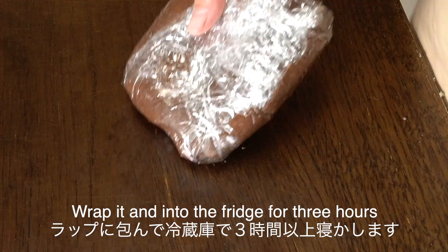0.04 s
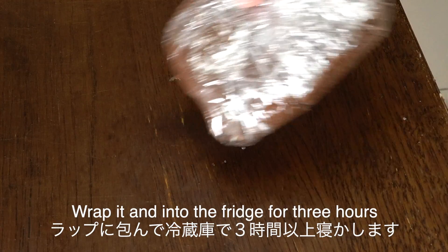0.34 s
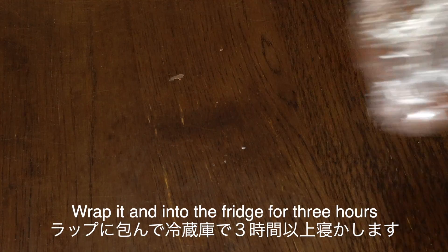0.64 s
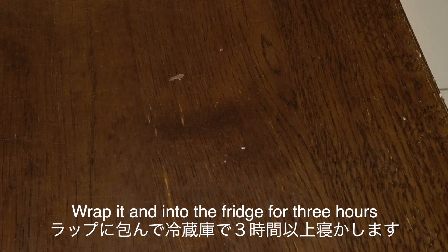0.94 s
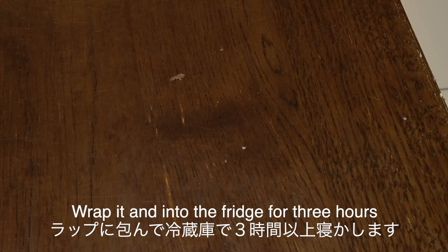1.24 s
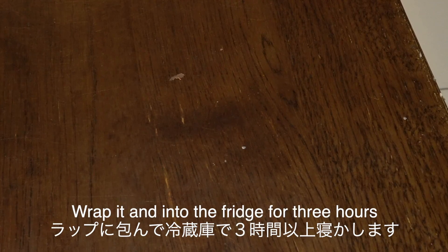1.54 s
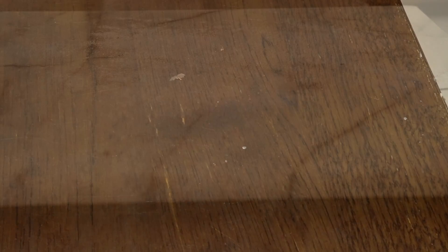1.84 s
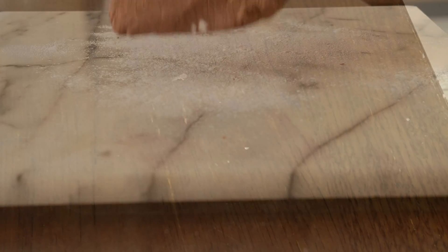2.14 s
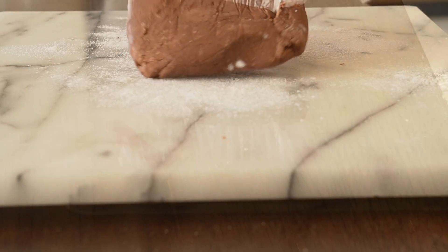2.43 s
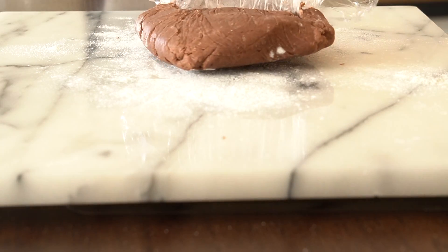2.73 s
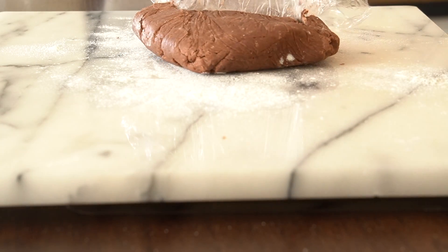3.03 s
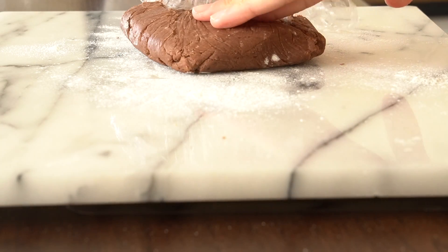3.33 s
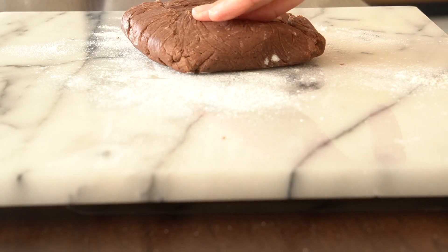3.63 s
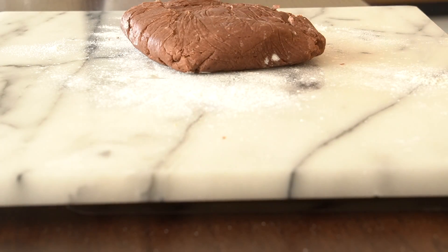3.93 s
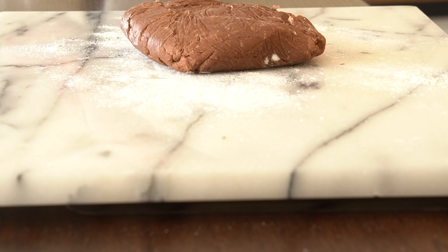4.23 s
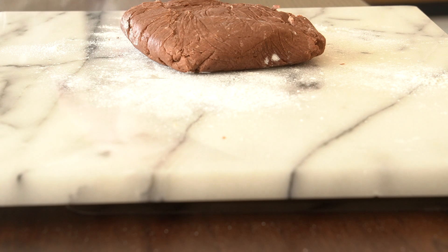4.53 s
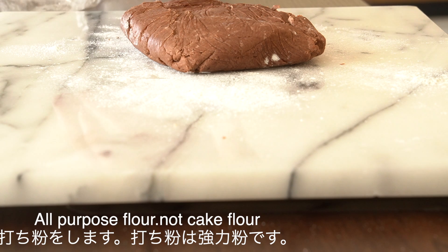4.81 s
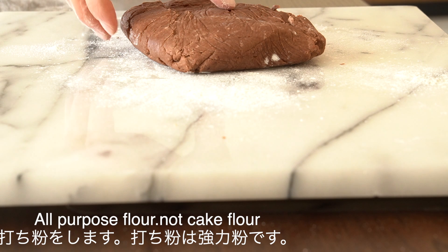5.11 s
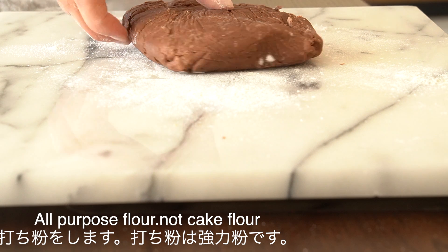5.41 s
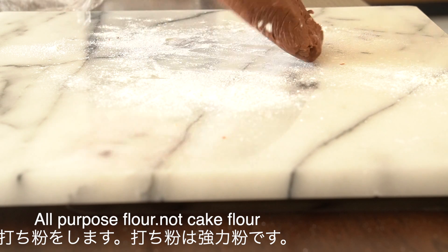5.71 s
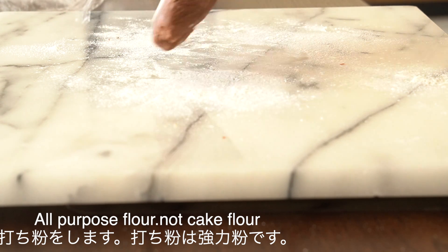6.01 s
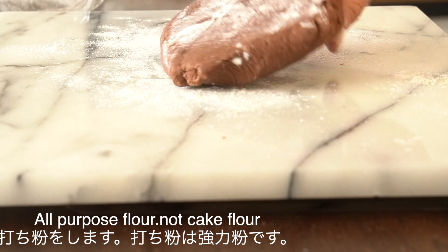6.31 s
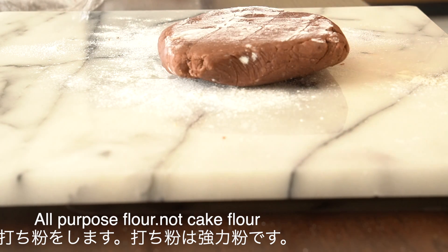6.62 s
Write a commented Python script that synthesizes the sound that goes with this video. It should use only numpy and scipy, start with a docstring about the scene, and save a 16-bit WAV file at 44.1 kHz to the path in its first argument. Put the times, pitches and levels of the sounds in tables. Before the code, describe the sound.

Close up, plastic-wrapped dough is handled in a slightly echoing kitchen. Cloth rustles against a fan hum, followed by a distant knock and a brief, very deep wobble. The hum gives way to quiet room tone while the dough lands in a run of soft thuds on stone. The wrap crackles and unsticks with a short rasp. Hands rustle lightly, and two more dull landings come near the end.

```python
"""A lump of dough in cling film thumps and slaps down in a small kitchen, setting slab and table ringing.
Sleeves swish over an appliance hum; a distant knock and a deep wobble come as the dough is picked up.
The hum fades under a run of soft landings. The film crinkles as its creases buckle, then peels off
in one sticky pull. Hands rustle, and the dough is turned over and lands twice on the stone slab.
The room rings on after each contact."""
import sys
import numpy as np
from scipy import signal
from scipy.fft import rfft, irfft, next_fast_len
from scipy.io import wavfile
from scipy.ndimage import uniform_filter1d

SR = 44100
rng = np.random.default_rng(int(sys.argv[2]) if len(sys.argv) > 2 else 0)


def transcribe(u):
    """Save the signal u as a 16-bit wav file named by the first command-line argument.

    u: samples, shape (n,) or (channels, n), limited to [-1, 1]; the rate is SR.
    q: integer samples, one column per channel.
    """
    v = np.clip(np.atleast_2d(u).T, -1, 1)
    q = np.round(v * 32767).astype(np.int16)
    wavfile.write(sys.argv[1], SR, q)


N = 298116
TIME = np.arange(N) / SR

# Event levels are relative within a layer; the layer's trim and the room come on top.
# fan noise of the running appliance: f/Hz, level/dB
FAN_EQ = [(12, -41), (20, -5), (65, -3), (123, -10.5), (301, -16.5), (446, -16), (678, -15.5), (759, -21.5),
          (825, -16), (1290, -18), (1570, -21.5), (2530, -20), (3340, -29), (11100, -39.5), (16000, -43)]
# appliance hum: f/Hz, level/dB
APPLIANCE_HUM = [(59.2, -80), (118.4, -71.5), (759, -71.5)]
# quieter room tone that takes over: f/Hz, level/dB
ROOM_TONE_EQ = [(12, -28), (20, -1), (127, -6), (163, -9.5), (285, -12), (388, -14.5), (434, -15),
                (825, -18.5), (1000, -18), (1190, -20.5), (1910, -23.5), (2990, -22.5), (3440, -29.5),
                (14700, -37.5), (16000, -38)]
# faint whines in the quiet room: f/Hz, level/dB
ROOM_WHINES = [(1174, -88.5), (1507, -88), (1615, -90)]
# stereo width of the noise beds: f/Hz, side over mid/dB
BED_WIDTH = [(30, 7.5), (70, -0.5), (150, 1), (600, 0.5), (1400, -2), (2700, -5), (4000, -2), (8000, -1),
             (16000, -2)]
# kitchen reverb time: f/Hz, t60/s
KITCHEN_DECAY = [(100, 0.89), (300, 0.43), (1000, 0.56), (3000, 0.7), (7000, 0.57), (15000, 0.33)]
# stereo width of the reflections: f/Hz, side over mid/dB
KITCHEN_WIDTH = [(60, 7), (200, -2.5), (700, -3.5), (1500, -5), (2700, -13), (4200, -4), (8000, 0.5),
                 (16000, 3)]
# sleeves and hands sliding: t/s, rise/s, length/s, level/dB
SLEEVE_MOVES = [(.07, 0.11, 0.28, -61.5), (.655, 0.005, 0.02, -57.5), (.68, 0.45, 0.44, -56.5),
                (4.6, 0.012, .025, -65.5), (4.718, 0.0074, 0.16, -67.5), (5.655, 0.019, .05, -76),
                (6.39, .05, .06, -74)]
# friction of cloth and skin: f/Hz, level/dB
SLEEVE_EQ = [(300, -8), (900, -11), (1800, -2), (2800, 2), (3600, -2.5), (6000, -6.5), (10000, -15),
             (13000, -19.5), (16000, -23)]
# short scuffs of hands, film and landing dough: t/s, level/dB, f/Hz, width/Hz, t60/s
SCUFFS = [(.156, -45, 2280, 895, 0.024), (1.518, -43.5, 3630, 2920, 0.059),
          (1.519, -47.5, 9050, 2500, 0.048), (2.52, -50, 2200, 2000, .15), (2.776, -52.5, 2300, 1460, .42),
          (3.25, -50, 2370, 1450, 0.04), (4.355, -61, 2520, 700, 0.12), (4.422, -58, 2380, 1200, 0.17),
          (4.722, -61.5, 3330, 1800, 0.15), (5.663, -75.5, 11000, 6000, 0.44),
          (6.144, -61, 2490, 1600, .069), (6.446, -60, 2600, 2000, 0.039)]
# sub-bass swells: t/s, rise/s, length/s, level/dB
SUB_SWELLS = [(1.3, 0.68, 1.1, -54), (2.03, 0.057, 0.21, -41.5)]
# fingers gripping and shifting the film: t/s, length/s, level/dB
FILM_GRIPS = [(1.45, 0.61, -70), (1.999, .04, -60), (2.116, 0.11, -64), (2.284, 0.073, -61),
              (2.37, 0.044, -56), (2.45, 0.079, -50.5), (2.576, 0.026, -51.5), (2.667, 0.027, -52.5),
              (2.754, 0.1, -50.5), (2.867, .08, -57), (3.024, 0.11, -59), (3.199, 0.057, -58.5),
              (3.873, 0.24, -66), (4.18, .18, -72), (4.342, 0.28, -65.5)]
# crinkling film: f/Hz, level/dB
FILM_EQ = [(300, 2), (1000, -1.5), (2000, 2), (2900, 1), (4800, -5.5), (6500, -2), (9000, -6.5),
           (13000, -8), (16000, -16)]
# single creases snapping: t/s, level/dB, f/Hz
CREASE_SNAPS = [(1.7476, -47, 8550), (2.0917, -45.5, 8100), (2.128, -45, 6250), (2.2193, -46, 6950),
                (2.304, -41, 5940), (2.3225, -40.5, 5940), (2.376, -35.5, 11400), (2.3908, -37.5, 4540),
                (2.4675, -38, 6220), (2.543, -38, 7780), (2.59, -42, 6470), (3.043, -42, 6600),
                (3.082, -37, 6800), (3.1344, -45, 7660), (3.3498, -30, 7500), (4.531, -42.5, 6350),
                (4.609, -50, 6710), (4.777, -50.5, 5770)]
# blows of a knock across the kitchen: t/s, level/dB
KNOCK_HITS = [(1.6107, -44), (1.615, -42), (1.688, -56)]
# dull body of the knock: f/Hz, level/dB
KNOCK_EQ = [(60, -9), (115, 6.5), (290, -11), (460, 5.5), (700, -9), (1100, -6.5), (1800, -13.5),
            (3000, -20), (4500, -36), (10000, -47)]
# dough landings: t/s, level/dB, f/Hz, swell/cycles, slap over thump/dB, slab jolt over slap/dB
LANDINGS = [(2.014, -48.5, 150, 0.44, -33, 0), (2.301, -37, 218, 0.68, -41, 0),
            (2.507, -31.5, 238, 0.86, -22, 0), (2.520, -27.5, 250, 0.79, -4, -9),
            (2.583, -30, 243, .59, -7.5, -6), (2.634, -35, 265, 0.92, -12, -6),
            (2.834, -33, 201, 0.64, -6.5, -8), (6.1415, -26, 195.5, 0.47, -12.5, -5),
            (6.433, -39.5, 154, 0.42, -16, -3), (6.448, -35.5, 196, 0.37, -18, 11),
            (6.468, -36, 226, .45, -17, 0)]
# air slapping out from under the dough: f/Hz, level/dB
SLAP_EQ = [(150, 1), (300, -1.5), (500, 0.5), (740, -7), (1080, -7.5), (1400, -23), (2800, -20),
           (3800, -44), (8000, -45), (16000, -56)]
# modes of slab, table and room: f/Hz, level/dB, t60/s, left phase lead/rad
SLAB_AND_ROOM_MODES = [(62.7, -7, 1, -2.5), (126, -11, 0.31, -0.5), (135, -15.5, 0.47, -1.4),
                       (159.5, -21.5, 0.49, -5.5), (200.2, -28.5, 0.5, -1.5), (238, -18.5, 0.12, -1.5),
                       (302.6, -15, 0.26, -3), (393, -23, 0.24, 3.5), (502, -8, 0.23, -1.5),
                       (676, -35, 0.18, -1), (912, -1, 0.33, -1.6), (1065, -6, 0.15, -2),
                       (2690, -1, 0.19, -.5)]
# the peeling pull, hardest just before it ends: t/s, level/dB
PEEL_PULL = [(3.358, -45.5), (3.368, -54.5), (3.39, -37), (3.528, -42), (3.542, -34), (3.622, -36.5),
             (3.664, -28.5), (3.668, -31)]
# film unsticking from dough: f/Hz, level/dB
PEEL_EQ = [(47, -46), (80, -16), (125, -8), (199, -14), (303, -8), (353, -12), (917, -8.5), (1340, -7.5),
           (1490, -6.5), (2840, -3), (4830, -11.5), (5520, -7.5), (12500, -13.5), (16000, -17.5)]
# taut film twanging during the pull: t/s, level/dB, f/Hz, width/Hz, t60/s
FILM_TWANG = (3.5, -27, 2800, 900, 0.0035)


def undb(db):
    """Decibels to gain."""
    return 10 ** (np.asarray(db) / 20)


def fade(t, t60):
    """Exponential decay of 60 dB in t60."""
    return np.exp(-np.log(1000) * t / t60)


def add(track, s, sound):
    """Mix a sound in at s seconds."""
    i = int(s * SR)
    track[i:i + len(sound)] += sound[:N - i]


def lookup(hz, points):
    """Read (Hz, value) points on a log-frequency axis."""
    f, value = np.transpose(points)
    return np.interp(np.log(hz + 1), np.log(f), value)


def eq(x, points, keep_power=True):
    """Filter by (Hz, dB) points; keep_power holds white noise at the same power."""
    size = next_fast_len(len(x) + 2048)
    gain = undb(lookup(np.arange(size // 2 + 1) * SR / size, points))
    if keep_power:
        gain = gain / np.sqrt(np.mean(gain ** 2))
    return irfft(rfft(x, size) * gain, size)[:len(x)]


def resonate(x, hz, width_hz):
    """One resonance, gain 1 at its centre."""
    return signal.lfilter(*signal.iirpeak(min(hz, SR * .45), hz / width_hz, fs=SR), x)


def drift(rate):
    """Smooth random modulation, rate turns a second, with a spread near 1."""
    hold = int(SR / rate)
    steps = np.repeat(rng.standard_normal(N // hold + 1), hold)
    return 1.2 * uniform_filter1d(steps, hold)[:N]


def stereo(mid, side):
    """Left and right from mid and side."""
    return np.array([mid + side, mid - side])


def convolve(x, response):
    """Play a track through a stereo response."""
    return signal.fftconvolve(x[None], response, axes=1)[:, :N]


def strokes(rows, release_t60):
    """Envelope of gestures that rise, hold and die away; their powers add."""
    power = 0
    for s, rise, length, db in rows:
        attack = np.clip((TIME - s) / rise, 0, 1)
        release = fade(np.clip(TIME - s - length, 0, 2), release_t60)
        power += (undb(db) * attack * release) ** 2
    return np.sqrt(power)


def crackle(rate, spread_db):
    """Friction grain: rate random clicks a second, mostly weak, a few strong; rms 1."""
    size = undb(spread_db * np.minimum(rng.exponential(size=N), 3.5))
    clicks = (rng.random(N) < rate / SR) * size * np.sign(rng.standard_normal(N))
    return clicks / clicks.std()


def kitchen(x, early_db, late_db, early_t60=0.098):
    """Direct sound, quick reflections off the worktop, then the tail of the room."""
    t = np.arange(int(.8 * SR)) / SR
    hz = np.arange(len(t) // 2 + 1) * SR / len(t)

    def reflections():
        noise, tail = rfft(rng.standard_normal(len(t))), 0
        for centre, t60 in KITCHEN_DECAY:
            band = lookup(hz, [(f, f == centre) for f, _ in KITCHEN_DECAY])
            tail += irfft(noise * band, len(t)) * fade(t, t60) * (1 - np.exp(-t / 0.0019))
        early = rng.standard_normal(len(t)) * fade(t, early_t60) * (t > .001)
        return undb(late_db) * tail / np.linalg.norm(tail) + undb(early_db) * early / np.linalg.norm(early)

    mid = reflections()
    side = eq(reflections(), KITCHEN_WIDTH, keep_power=False)
    return x + convolve(x, stereo(mid, side))


def scatter(x, early_db, late_db, spots=3):
    """Each 64-sample grain comes from a random spot with its own reflections."""
    spot = np.repeat(rng.integers(0, spots, N // 64 + 1), 64)[:N]
    gates = (uniform_filter1d(1. * (spot == k), 32) for k in range(spots))
    return sum(kitchen(x * gate, early_db, late_db) for gate in gates)


def noise_bed(spectrum, db, flicker_db=0.9):
    """Diffuse room noise that wavers slightly."""
    mid, side = (eq(rng.standard_normal(N), spectrum) for _ in range(2))
    side = eq(side, BED_WIDTH, keep_power=False)
    return stereo(mid, side) * undb(db + flicker_db * drift(6))


def hum(partials, waver_db=1.3, waver_hz=1.05):
    """Held tones that waver a little in level and pitch."""
    track = np.zeros(N)
    for hz, db in partials:
        amplitude = np.sqrt(2) * undb(db + waver_db * drift(7))
        cycles = np.cumsum(hz + waver_hz * drift(11)) / SR
        track += amplitude * np.sin(2 * np.pi * cycles)
    return track


def ambience(fade_from_s=1.91, fade_to_s=2.31):
    """The hum and fan noise fade down while a quieter room tone fades up."""
    earlier = np.clip((fade_to_s - TIME) / (fade_to_s - fade_from_s), 0, 1)
    appliance = earlier * noise_bed(FAN_EQ, db=-61) + np.sqrt(earlier) * hum(APPLIANCE_HUM)
    room_tone = noise_bed(ROOM_TONE_EQ, db=-66) + hum(ROOM_WHINES)
    return appliance + np.sqrt(1 - earlier) * room_tone


def sleeves(trim_db=-4):
    """Cloth and skin slide in swishes of fine friction."""
    friction = eq(crackle(rate=9000, spread_db=2.5), SLEEVE_EQ)
    swishes = friction * strokes(SLEEVE_MOVES, release_t60=0.39)
    return scatter(undb(trim_db) * swishes, early_db=0.84, late_db=-1.3)


def scuffs(rows):
    """Short bursts of friction, each a band of noise with a fast attack."""
    t = np.arange(int(.4 * SR)) / SR
    attack = 1 - np.exp(-t / 0.0017)
    track = np.zeros(N)
    for s, db, hz, width_hz, t60 in rows:
        band = resonate(rng.standard_normal(len(t)), hz, width_hz)
        band = resonate(band, hz, width_hz)  # steeper skirts
        add(track, s, undb(db) * band / band.std() * attack * fade(t, t60))
    return kitchen(track, early_db=-5, late_db=-12)


def sub_wobble(hz=21, width_hz=7, side_db=9):
    """A wide, very deep wobble that swells as the dough first comes down."""
    phase = 2 * np.pi * np.cumsum(hz + width_hz / 2 * drift(20.87)) / SR
    return strokes(SUB_SWELLS, release_t60=.25) * stereo(np.sin(phase), undb(side_db) * np.cos(phase))


def creases(activity, ping_t60=0.0038, spread_db=4, candidates=30000):
    """Each buckling crease pings at its own pitch; more buckle as activity (0-1) rises."""
    t = np.arange(160) / SR
    when, chance, pitch, strength, phase = rng.random((candidates, 5)).T
    start = (when * (N - len(t))).astype(int)
    density = .2 + .8 * activity[start]
    buckles = chance < density
    # sparser pings are louder, so the power stays even
    gain = undb(spread_db * np.minimum(-np.log(strength), 3.5)) / np.sqrt(density)
    hz = 2000 + 14000 * pitch[buckles, None]
    pings = gain[buckles, None] * fade(t, ping_t60) * np.sin(2 * np.pi * (hz * t + phase[buckles, None]))
    positions = start[buckles, None] + np.arange(len(t))
    track = np.bincount(positions.ravel(), pings.ravel(), N)
    return track / track.std()


def film_crinkle(crinkle_db=-2, slide_db=-3, flurry_db=2, attack_s=0.016):
    """Creases buckle in flurries under the fingers and relax, over the friction of sliding film."""
    handling = strokes([(s, attack_s, length, db) for s, length, db in FILM_GRIPS], release_t60=0.36)
    flurries = creases(handling / handling.max()) * undb(crinkle_db + flurry_db * drift(70))
    sliding = undb(slide_db) * crackle(rate=4000, spread_db=4)
    return scatter(eq((flurries + sliding) * handling, FILM_EQ), early_db=-7.5, late_db=-6)


def distant_knock(trim_db=18, rattle_db=-20, rattle_t60=0.049):
    """A dull double knock with a short rattle, heard mostly through the room."""
    t = np.arange(int(.2 * SR)) / SR
    blows = np.zeros(N)
    for s, db in KNOCK_HITS:
        rattle = undb(rattle_db) * rng.standard_normal(len(t)) * fade(t, rattle_t60)
        add(blows, s, undb(db + trim_db) * ((t == 0) + rattle))
    return scatter(eq(blows, KNOCK_EQ), early_db=-0.83, late_db=3.1)


def film_snaps(trim_db=3, width_hz=8000, t60=0.0043):
    """Single creases give way with a bright, nearly dry tick."""
    t = np.arange(int(.02 * SR)) / SR
    snaps = np.zeros(N)
    for s, db, hz in CREASE_SNAPS:
        snap = resonate(rng.standard_normal(len(t)) * fade(t, t60), hz, width_hz)
        add(snaps, s, undb(db + trim_db) * snap / np.abs(snap).max())
    return kitchen(snaps, early_db=-9, late_db=-27)


def thump(t, hz, swell_cycles):
    """A soft contact that swells and dies in a few cycles."""
    squash = t * hz / (2 * swell_cycles)
    return squash ** 1.5 * np.exp(.75 * (1 - squash ** 2)) * np.sin(2 * np.pi * hz * t)


def slab_ring(force, trim_db=-38):
    """Slab, table and the room's standing waves ring on, out of phase between left and right."""
    t = np.arange(SR) / SR
    ears = np.array([[.5], [-.5]])
    modes = sum(undb(db) * fade(t, t60) * np.cos(2 * np.pi * hz * t + ears * lead)
                for hz, db, t60, lead in SLAB_AND_ROOM_MODES)
    return undb(trim_db) * convolve(force, modes)


def dough(slap_t60=0.075, slump_s=0.01697, slump_db=-12.5, slump_ratio=0.605):
    """Each landing thumps, then slumps weaker and lower; trapped air slaps out and the slab is jolted."""
    t = np.arange(int(.3 * SR)) / SR
    slap_envelope = fade(t, slap_t60) * (1 - np.exp(-t / 0.0021))
    thumps, slaps, jolts = np.zeros((3, N))
    for s, db, hz, swell_cycles, slap_db, jolt_db in LANDINGS:
        add(thumps, s, undb(db) * thump(t, hz, swell_cycles))
        add(thumps, s + slump_s, undb(db + slump_db) * thump(t, hz * slump_ratio, swell_cycles))
        slap = undb(db + slap_db) * rng.standard_normal(len(t)) * slap_envelope
        add(slaps, s, slap)
        add(jolts, s, undb(jolt_db) * np.linalg.norm(slap) * (t == 0))
    body = kitchen(thumps, early_db=-31, late_db=-12.5)
    smack = kitchen(eq(slaps, SLAP_EQ), early_db=-2, late_db=-0.5)
    return body + smack + slab_ring(thumps + eq(jolts, SLAP_EQ))


def film_peel(trim_db=-2, judder_db=1.7, edge_s=0.0057):
    """Sticky film lets go of the dough in thousands of tiny slips a second, twanging once on the way."""
    times, levels = np.transpose(PEEL_PULL)
    outside_s = np.maximum(times[0] - TIME, 0) + np.maximum(TIME - times[-1], 0)
    pull = undb(np.interp(TIME, times, levels)) * np.exp(-outside_s / edge_s)
    slips = crackle(rate=6000, spread_db=3.9) * pull * undb(trim_db + judder_db * drift(350))
    return scatter(eq(slips, PEEL_EQ), early_db=-10.5, late_db=-6.5) + scuffs([FILM_TWANG])


def scene():
    """Dough, film and hands up front, the rest of the kitchen behind."""
    foley = dough() + film_crinkle() + film_snaps() + film_peel() + sleeves() + scuffs(SCUFFS)
    return foley + distant_knock() + sub_wobble() + ambience()


def record(dry):
    """The microphone housing rings near 3 kHz in both channels alike; the top is cut."""
    housing = 0.45 * resonate(dry.mean(axis=0), hz=2814, width_hz=360)
    high_cut = signal.ellip(10, .2, 70, 15900, fs=SR, output="sos")
    return signal.sosfilt(high_cut, dry + housing)


dry = scene()
out = record(dry)
transcribe(out)
```